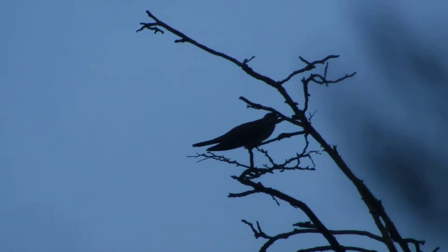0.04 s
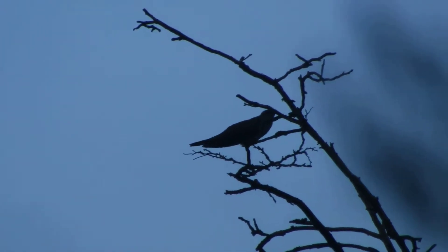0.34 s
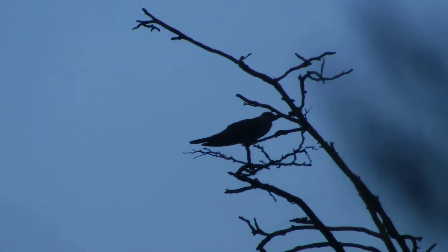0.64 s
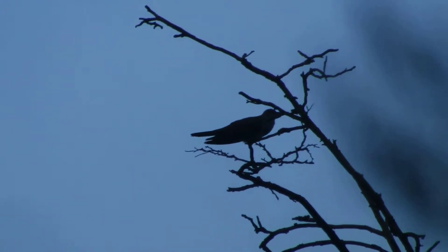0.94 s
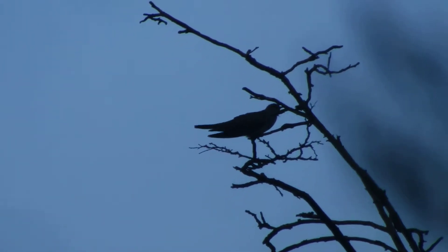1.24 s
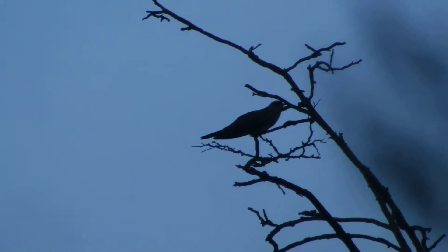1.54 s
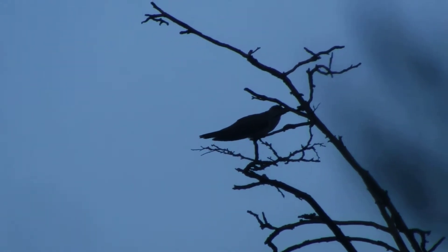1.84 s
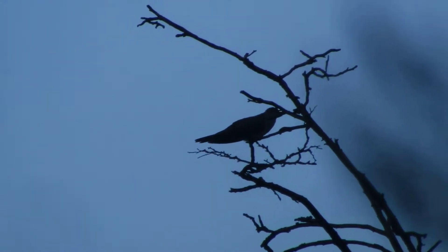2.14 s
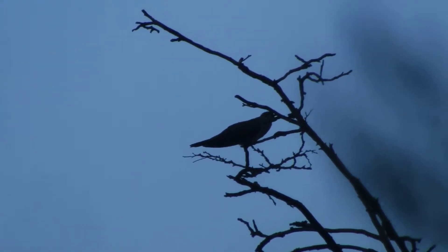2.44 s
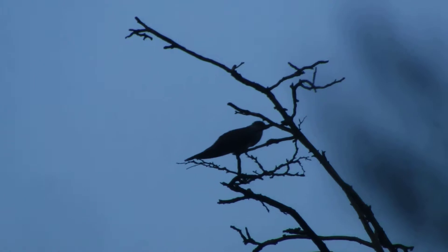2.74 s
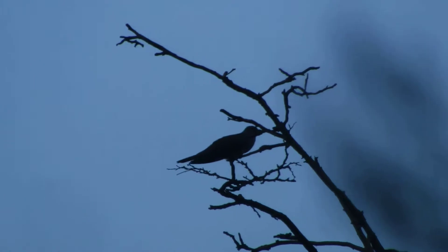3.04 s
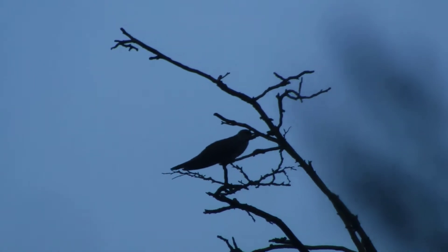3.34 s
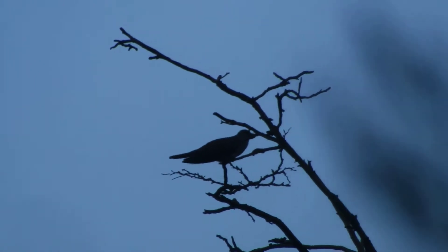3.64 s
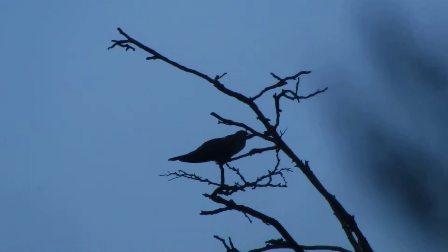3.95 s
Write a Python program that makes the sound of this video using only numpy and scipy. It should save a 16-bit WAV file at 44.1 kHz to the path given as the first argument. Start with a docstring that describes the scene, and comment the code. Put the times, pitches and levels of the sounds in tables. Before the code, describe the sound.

Among trees, a cuckoo calls a high note then a lower one, pauses, and calls again. Smaller birds keep up quick, high chirps and sliding whistles around it, while the microphone picks up still air and faint hiss.

```python
"""A cuckoo on a bare branch calls twice, a high arched note and then a low level one, both nearly pure.
Songbirds whistle and chirp around it in quick frequency glides. Reflections from the trunks prolong
the notes, and the far birds arrive as reverberation only. Under them lie the broadband noise of
still outdoor air and a camera's own hum, hiss, two short whirrs and one soft bump."""
import sys
import numpy as np
from scipy import signal
from scipy.fft import rfft, irfft, next_fast_len
from scipy.io import wavfile
from scipy.ndimage import uniform_filter1d, map_coordinates

SR = 44100
rng = np.random.default_rng(int(sys.argv[2]) if len(sys.argv) > 2 else 0)


def put_to_file(sound):
    """Save the sound as 16-bit audio at rate SR, in the file named by the first command-line argument."""
    columns = np.atleast_2d(sound).T  # one column per channel
    safe = np.clip(columns, -1, 1)
    whole_steps = np.round(safe * 32767)
    wavfile.write(sys.argv[1], SR, whole_steps.astype(np.int16))


N = 176400

# Noise spectra: f/Hz, relative spectral level/dB
AIR_SPECTRUM = [(12, -20), (45, 2.5), (100, 1), (220, -2), (500, -5), (1000, -10.5), (1700, -10),
                (3000, -26), (6000, -28.5), (9000, -34.5)]
CHORUS_SPECTRUM = [(1200, -28), (1800, -8), (2200, -9.5), (3200, 3.5), (4200, -4.5), (5500, -6.5),
                   (6500, -16.5), (9000, -39)]
HISS_SPECTRUM = [(3000, 3), (7500, -23), (9000, -6.5), (11000, -0.5), (14500, 1.5), (15800, -3.5)]
WHIRR_HISS_SPECTRUM = [(2000, 1), (5000, 0), (11000, -3), (15000, -6)]
WHIRR_BURR_SPECTRUM = [(100, -14), (220, 6), (330, -2), (700, -9), (1500, -27)]
# Partials of the camera's hum: f/Hz, level/dB
HUM_PARTIALS = [(20.2, -80.5), (40.4, -53), (60, -55.5), (120, -65.5), (180, -68.5), (240, -74), (300, -70),
                (360, -73)]
# Whirrs: onset t/s, hiss level/dB, burr level/dB
WHIRRS = [(1.678, -54, -52), (3.814, -55.5, -52.5)]
# Slurs of far birds: onset t/s, duration/s, initial f/Hz, final f/Hz, level/dB
FAR_SLURS = [ (-.05, 0.061, 4370, 2900, -48.5), (.01, 0.053, 5000, 3100, -47),
             (.362, 0.024, 2312, 3490, -46.5), (.415, 0.052, 2750, 2197, -50.5),
             (0.714, 0.09, 4533, 2790, -46), (1.08, 0.053, 5330, 3300, -71), (1.471, .03, 2900, 4730, -47),
             (1.489, .045, 4300, 2980, -43.5), (1.597, .12, 4900, 4720, -54.5),
             (1.618, 0.117, 3500, 3420, -56), (2.272, 0.035, 4390, 5130, -48),
             (2.329, 0.0483, 3404, 3014, -46.5), (2.684, 0.057, 5530, 2990, -52.5),
             (2.867, 0.023, 5400, 5000, -55), (3.076, 0.041, 4680, 3580, -43.5),
             (3.108, 0.039, 3590, 2690, -44), (3.849, .04, 4800, 4060, -47), (3.886, 0.06, 4200, 3027, -48),
             ]
# Nearer songbirds: onset t/s, duration/s, initial, middle and final f/Hz, direct and echo level/dB
SONG_NOTES = [ (0.08, .016, 3600, 3937, 3860, -41.5, -42), (0.089, 0.027, 3500, 3275, 3360, -47, -51.5),
              (0.136, 0.036, 5250, 5570, 5700, -43, -49.5), (0.202, 0.0142, 3200, 3670, 4100, -49.5, -48),
              (0.231, 0.023, 3700, 4800, 5530, -54.5, -57), (0.252, 0.0313, 5450, 5690, 5300, -43, -49),
              (0.387, 0.03, 3200, 2687, 2400, -50.5, -46), (0.604, 0.0098, 3700, 4280, 4930, -49, -46),
              (0.633, 0.0076, 5400, 5760, 6140, -50.5, -55), (0.636, 0.02, 4100, 5130, 5240, -42, -47.5),
              (1.158, .01, 1800, 1930, 2100, -54, -69), (1.172, .055, 2800, 2650, 2530, -52.5, -51.5),
              (1.22, 0.0198, 2580, 2496, 2360, -42.5, -43), (1.246, 0.082, 2360, 1964, 1698, -47.5, -52),
              (1.772, 0.042, 4280, 3924, 3250, -45, -42), (1.834, 0.013, 4100, 4040, 3540, -44, -43),
              (1.917, 0.045, 6100, 5130, 4540, -48, -49), (2.036, 0.02, 4650, 3900, 3150, -48, -49.5),
              (2.055, 0.041, 3200, 4230, 4600, -47, -57), (2.086, 0.021, 4800, 5210, 5500, -39.5, -40.5),
              (2.185, .018, 9000, 8400, 7700, -70, -69), (2.202, 0.019, 7500, 5560, 4600, -47.5, -49.5),
              (2.413, 0.024, 1750, 1820, 2100, -54, -63), (2.437, 0.13, 2270, 2248, 2237, -46, -52),
              (2.573, 0.059, 2320, 2266, 2290, -48, -56), (2.796, 0.015, 3980, 3656, 3510, -36.5, -39),
              (2.819, 0.051, 3150, 2780, 2450, -44.5, -44.5), (2.96, .04, 2500, 2266, 2040, -55.5, -56.5),
              (2.992, 0.051, 1950, 1794, 1795, -42.5, -54.5), (3.201, 0.0142, 3800, 3680, 3430, -44, -46.5),
              (3.219, 0.058, 3150, 2737, 2446, -46, -45.5), (3.344, 0.019, 3850, 3546, 3420, -44.5, -46.5),
              (3.358, 0.054, 3150, 2760, 2440, -46.5, -44.5), (3.417, 0.018, 4600, 4570, 4500, -60, -72),
              (3.54, .053, 2855, 2932, 2912, -38, -38), (3.597, 0.025, 2970, 3000, 2940, -36.5, -38),
              (3.634, 0.047, 2800, 2260, 1935, -53, -49), ]
# Second and third harmonics (the cuckoo's at its nominal pitch): level/dB re the fundamental
SONG_OVERTONES = [-36, -31.5]
CUCKOO_OVERTONES = [-24.5, -38]
# Contours of the cuckoo's two notes: t/duration, f/nominal f, relative level/dB
HIGH_CONTOUR = [(0, .9, -20), (.11, .965, -7), (.28, 1, -3.5), (.49, 1, -.5), (.66, .982, .5),
                (.77, .95, -1), (.87, .915, -7), (1, .895, -14)]
LOW_CONTOUR = [(0, .97, -18), (.17, .995, -3.5), (.42, 1, 0), (.68, 1, -.5), (.88, 1.003, -5),
               (1, .995, -13)]
# Faint far hoots: onset t/s, duration/s, nominal f/Hz, level/dB
FAR_HOOTS = [(.31, 0.22, 532.7, -56), (.58, 0.24, 519, -63), (1.08, 0.153, 520, -61)]
# Cuckoo calls: onset t/s, delay to the low note/s, high and low nominal f/Hz, high and low level/dB
CUCKOO_CALLS = [(.486, .311, 648.5, 518, -32.5, -41), (2.533, 0.28, 645, 511.5, -33, -38)]

AIR_DB, HISS_DB, CHORUS_DB, CHORUS_PATCH_DB = -53.5, -65.5, -57, 2
WHIRR_HISS_S, WHIRR_BURR_S = .034, .13
BUMP_AT_S, BUMP_HZ, BUMP_WIDTH_S, BUMP_ENVELOPE_DB = .597, 127, .0029, -35
REFLECTIONS_PER_S, DIFFUSE_DB = 500, -2.5
ATTACK_SHARE, RELEASE_SHARE = .25, .062
WAVER_DEPTH, WAVER_PER_S, FLUTTER_DB = .0084, 154.4, 2
BUZZ_DEPTH, BUZZ_PER_S = .0647, 420
RASP_DEPTH_PER_OCTAVE, RASP_PER_S = .067, 595
HIGH_NOTE_S, LOW_NOTE_S, CUCKOO_ECHO_DB, OVERTONE_DB_PER_OCTAVE = .096, .165, -10.5, 178
BAND_LIMIT_HZ = 15800


def amp(db):
    """Amplitude ratio of a level in decibels."""
    return 10 ** (np.asarray(db) / 20)


def unit(x):
    """Normalisation to unit rms."""
    return x / np.sqrt(np.mean(x ** 2) + 1e-20)


def wobble(rate, n):
    """Random modulation: a spline through rate Gaussian values a second."""
    return map_coordinates(rng.standard_normal(2048), [np.arange(n) * rate / SR], mode="wrap")


def progress(length):
    """Normalised time, 0 to 1, over a length in seconds."""
    return np.linspace(0, 1, int(length * SR))


def add(out, start, x):
    """Superposition of x on out from a time in seconds."""
    i = int(round(start * SR))
    x = x[max(-i, 0):max(N - i, 0)]
    out[max(i, 0):max(i, 0) + len(x)] += x


def noise(spectrum):
    """Spectral shaping of white noise, at unit rms."""
    hz, db = np.transpose(spectrum)
    f = np.fft.rfftfreq(N, 1 / SR)
    gain = amp(np.interp(np.log(f + 1), np.log(hz), db))
    return unit(irfft(rfft(rng.standard_normal(N)) * gain, N))


def wood_echo(x, t60_s, build_s, delay_s):
    """Reverberation: trunk reflections and a diffuse field decay exponentially, with the energy of x."""
    t = np.arange(SR) / SR
    trunks = unit(rng.standard_normal(SR) * (rng.random(SR) < REFLECTIONS_PER_S / SR))
    diffuse = amp(DIFFUSE_DB) * rng.standard_normal(SR)
    build = 1 - np.exp(-np.maximum(t - delay_s, 0) / build_s)
    decay = amp(-60 * t / t60_s)
    echo = signal.fftconvolve(x, (trunks + diffuse) * build * decay)
    return echo * np.linalg.norm(x) / np.linalg.norm(echo)


def still_air():
    """Stationary ambient noise, strongest at low frequencies."""
    return amp(AIR_DB) * noise(AIR_SPECTRUM)


def camera():
    """Hum as a line spectrum over steady hiss, two whirrs as noise bursts, a bump as a Gaussian pulse."""
    t = np.arange(N) / SR
    out = amp(HISS_DB) * noise(HISS_SPECTRUM)
    for hz, db in HUM_PARTIALS:
        out += np.sqrt(2) * amp(db) * np.sin(2 * np.pi * (hz * t + rng.random()))
    for start, hiss_db, burr_db in WHIRRS:
        for spectrum, length, db in ((WHIRR_HISS_SPECTRUM, WHIRR_HISS_S, hiss_db),
                                     (WHIRR_BURR_SPECTRUM, WHIRR_BURR_S, burr_db)):
            swell = np.sin(np.pi * np.sqrt(progress(length)))
            add(out, start, amp(db) * noise(spectrum)[:len(swell)] * swell)
    since = t - BUMP_AT_S
    bump_envelope = amp(BUMP_ENVELOPE_DB) * np.exp(-(since / BUMP_WIDTH_S) ** 2)
    return out - bump_envelope * np.sin(2 * np.pi * BUMP_HZ * since)


def far_chorus():
    """Distant song blurs into a noise band, modulated in random patches of time and frequency."""
    spectra = signal.stft(noise(CHORUS_SPECTRUM), nperseg=512)[2]
    patches = uniform_filter1d(rng.standard_normal(spectra.shape), size=7, axis=0)
    patches = uniform_filter1d(patches, size=22, axis=1)
    chorus = signal.istft(spectra * amp(CHORUS_PATCH_DB * unit(patches)), nperseg=512)[1][:N]
    return amp(CHORUS_DB) * unit(chorus)


def whistle(hz):
    """A songbird's tone on a pitch track, with slight random frequency and amplitude modulation."""
    n = len(hz)
    u = np.linspace(0, 1, n)
    phase = 2 * np.pi * np.cumsum(hz * (1 + WAVER_DEPTH * wobble(WAVER_PER_S, n))) / SR
    ramp = np.clip(np.minimum(u / ATTACK_SHARE, (1 - u) / RELEASE_SHARE), 0, 1)
    envelope = np.sin(np.pi / 2 * ramp) * amp(FLUTTER_DB * wobble(WAVER_PER_S, n))
    overtones = sum(amp(db) * np.sin(k * phase) * (k * hz < BAND_LIMIT_HZ)
                    for k, db in enumerate(SONG_OVERTONES, 2))
    return np.sqrt(2) * envelope * (np.sin(phase) + (hz > 3200) * overtones)  # lower notes are pure


def far_birds():
    """Exponential glides, made buzzy by fast frequency modulation, heard only as reverberation."""
    out = np.zeros(N)
    for start, length, first, last, db in FAR_SLURS:
        u = progress(length)
        glide = first * (last / first) ** u
        note = whistle(glide * (1 + BUZZ_DEPTH * wobble(BUZZ_PER_S, len(u))))
        add(out, start, amp(db) * wood_echo(note, t60_s=.44, build_s=.003, delay_s=0))
    return out


def songbirds():
    """Parabolic glides as direct sound plus reverberation; frequency jitter roughens the wide sweeps."""
    out = np.zeros(N)
    for start, length, first, middle, last, direct_db, echo_db in SONG_NOTES:
        u = progress(length)
        glide = first + (last - first) * u + 2 * (2 * middle - first - last) * u * (1 - u)
        rasp = RASP_DEPTH_PER_OCTAVE * np.log2(last / first) * wobble(RASP_PER_S, len(u))
        note = whistle(glide * (1 + rasp))
        t60_s = .46 * min(1, 3500 / middle) ** .28  # echoes die sooner above 3500 Hz
        add(out, start, amp(direct_db) * note)
        add(out, start, amp(echo_db) * wood_echo(note, t60_s, build_s=.01, delay_s=.0027))
    return out


def hoot(contour, length, hz, db):
    """A nearly sinusoidal cuckoo note whose weak harmonics fade as the fundamental sags."""
    u = progress(length)
    knots, ratios, levels = np.transpose(contour)
    bend = np.interp(u, knots, ratios)
    phase = 2 * np.pi * np.cumsum(hz * bend) / SR
    overtones = sum(amp(level) * np.sin(k * phase) for k, level in enumerate(CUCKOO_OVERTONES, 2))
    tone = np.sin(phase) + amp(OVERTONE_DB_PER_OCTAVE * np.log2(bend)) * overtones
    envelope = amp(db + np.interp(u, knots, levels)) * signal.windows.tukey(len(u), .16)
    return np.sqrt(2) * envelope * tone


def cuckoo():
    """Two falling two-note calls whose direct sound outweighs the reverberation, and faint far hoots."""
    out = np.zeros(N)
    for start, delay, high_hz, low_hz, high_db, low_db in CUCKOO_CALLS:
        high = hoot(HIGH_CONTOUR, HIGH_NOTE_S, high_hz, high_db)
        low = hoot(LOW_CONTOUR, LOW_NOTE_S, low_hz, low_db)
        for onset, note in (start, high), (start + delay, low):
            add(out, onset, note)
            add(out, onset, amp(CUCKOO_ECHO_DB) * wood_echo(note, t60_s=.52, build_s=.006, delay_s=.018))
    for start, length, hz, db in FAR_HOOTS:
        add(out, start, hoot(LOW_CONTOUR, length, hz, db))
    return out


def scene():
    """Linear superposition of all sources at one microphone."""
    return (cuckoo() + songbirds() + far_birds() + far_chorus() + still_air() + camera())[None]


def record(dry):
    """An ideal low-pass filter at the camera's band limit."""
    size = next_fast_len(N + SR // 2)
    passband = np.fft.rfftfreq(size, 1 / SR) < BAND_LIMIT_HZ
    return irfft(rfft(dry, size) * passband, size)[:, :N]


dry = scene()
out = record(dry)
put_to_file(out)
```